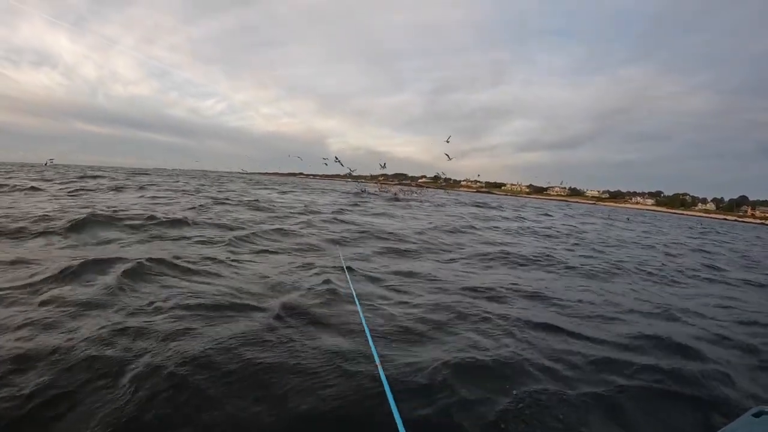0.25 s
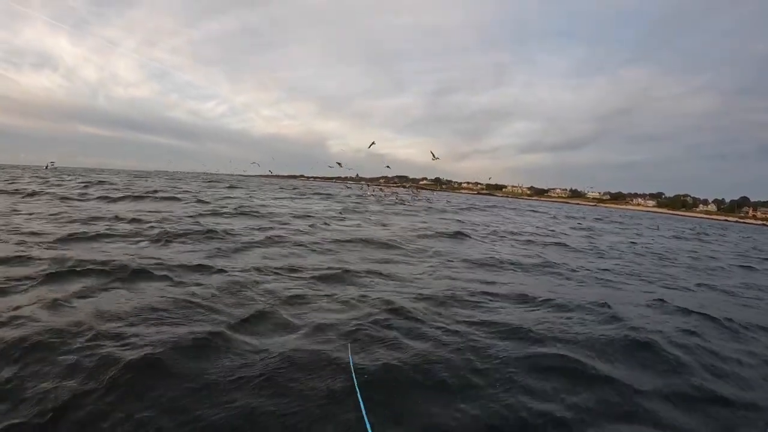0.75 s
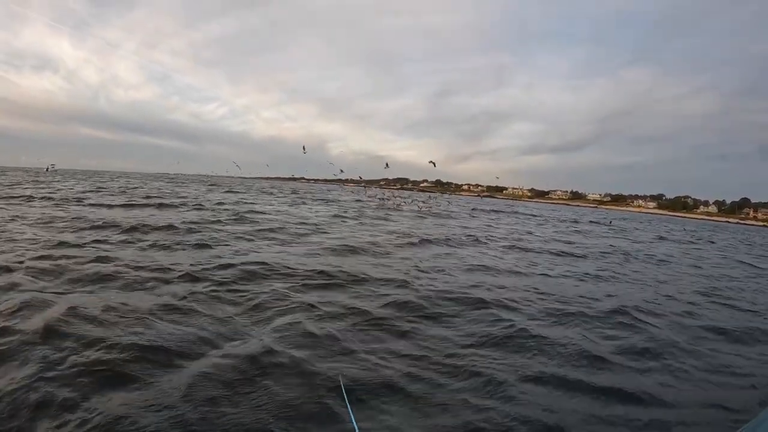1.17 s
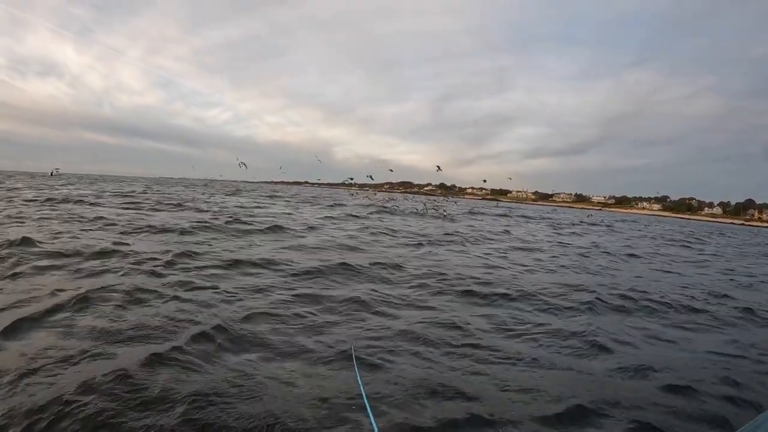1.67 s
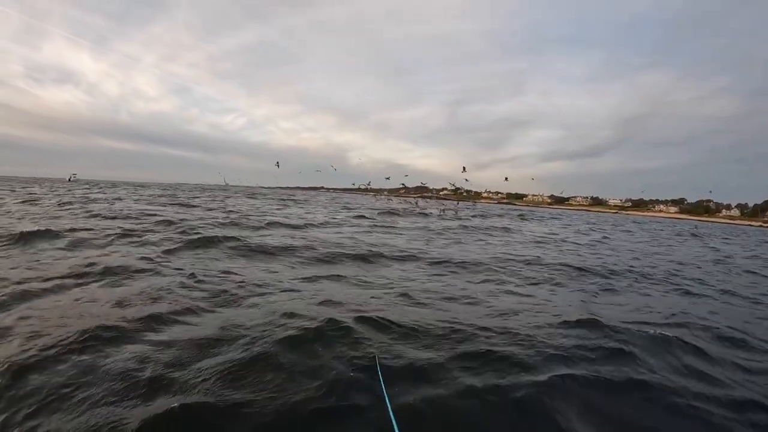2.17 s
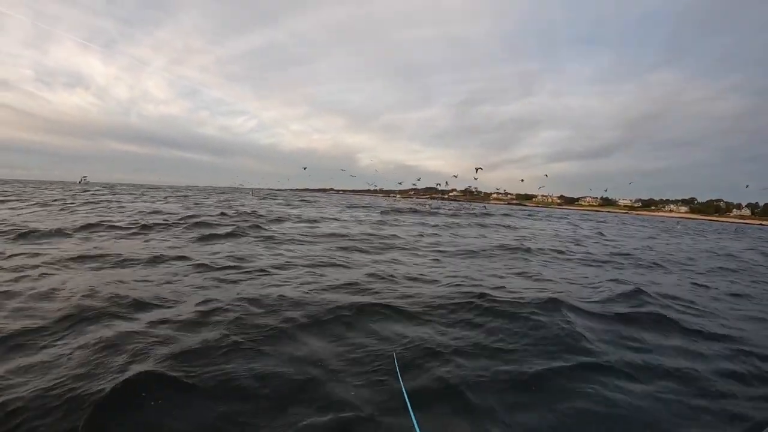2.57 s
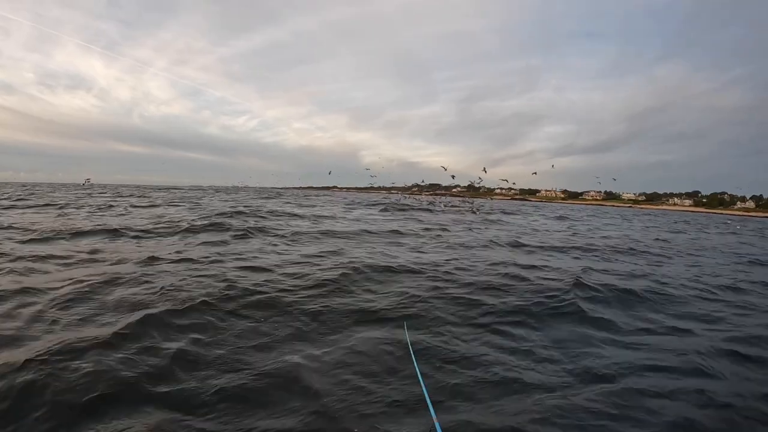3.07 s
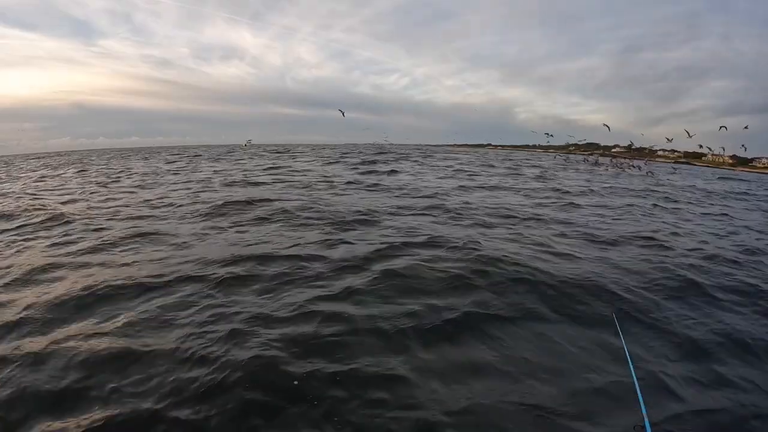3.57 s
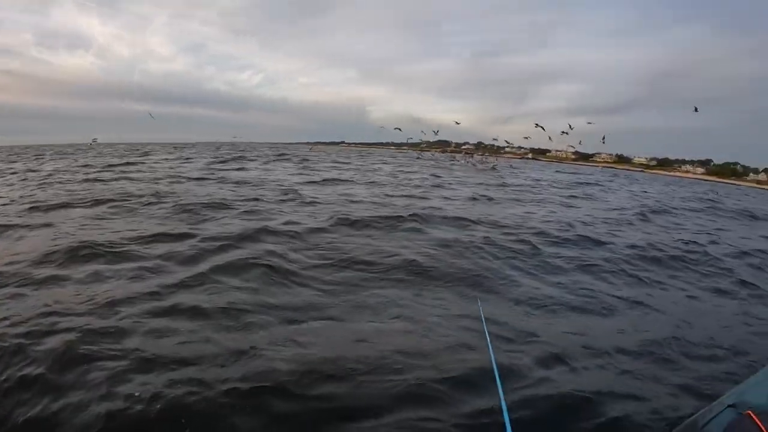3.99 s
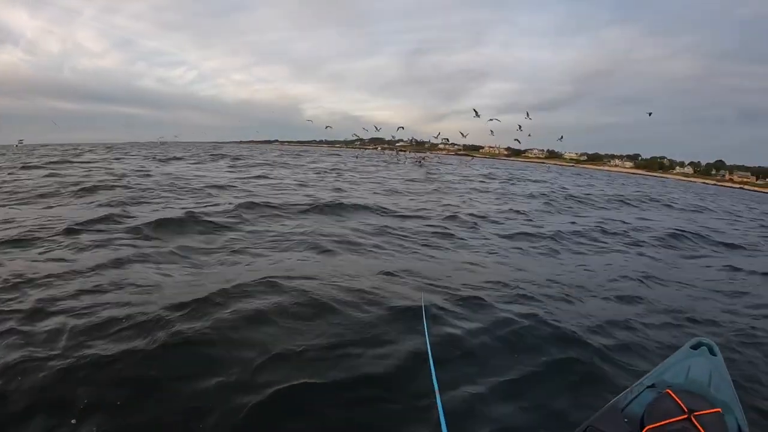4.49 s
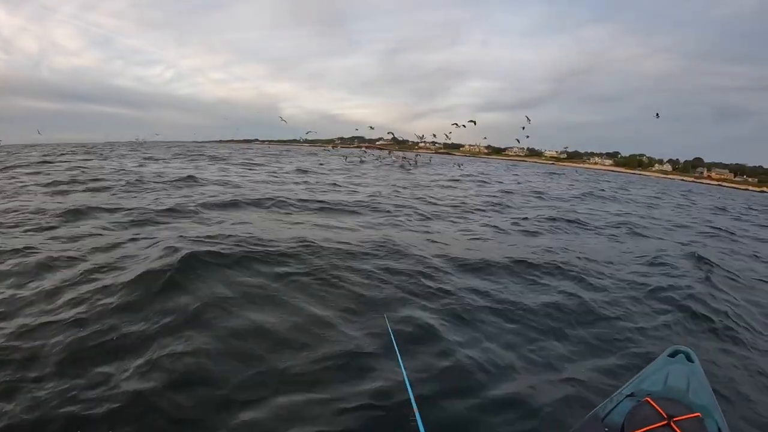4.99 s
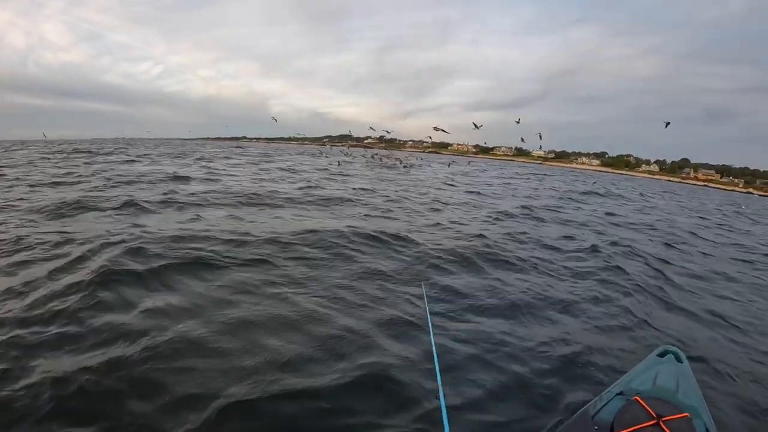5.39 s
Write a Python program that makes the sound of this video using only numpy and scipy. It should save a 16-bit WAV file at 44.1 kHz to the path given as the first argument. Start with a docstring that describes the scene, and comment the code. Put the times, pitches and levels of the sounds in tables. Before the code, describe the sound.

Shrill seabird whistles, harsh short squawks and distant flock chatter over soft sea hiss, with low wind buffeting the microphone throughout.

```python
"""Over choppy water, some way off, a flock of terns and gulls feeds: thin arched whistles, short harsh rasps,
a knot of quick chirps, and the blur of the birds behind. Wind buffets the small microphone; the sea hisses.
Whistles and chirps are near sines on bending pitches, rasps are harmonic series with half-pitch lines and
breath noise, and the far flock blends random notes with noise. Wind and sea are noise shaped in frequency
and time; short kicks of pressure sharpen the gusts."""
import sys
import numpy as np
from scipy import signal
from scipy.fft import rfft, irfft, next_fast_len
from scipy.io import wavfile
from scipy.ndimage import uniform_filter1d, map_coordinates

SR = 44100
rng = np.random.default_rng(int(sys.argv[2]) if len(sys.argv) > 2 else 0)


def put_to_file(sound):
    """Save the sound as 16-bit audio at rate SR, in the file named by the first command-line argument."""
    columns = np.atleast_2d(sound).T  # one column per channel
    safe = np.clip(columns, -1, 1)
    whole_steps = np.round(safe * 32767)
    wavfile.write(sys.argv[1], SR, whole_steps.astype(np.int16))


N = 248724  # length in samples

# Resonance of the birds' throats. Each row: frequency in Hz, gain in dB.
THROAT = [(1200, -11), (2000, -8.5), (2500, -4), (3000, 0), (3650, 2.5), (4400, -3.5), (6000, -8.5),
          (7500, -16), (8500, -33.5), (11000, -38.5), (14000, -61)]


def amp(db):
    """The decibel law: 20 dB is a factor of ten in amplitude."""
    return 10 ** (np.asarray(db) / 20)


def unit(x):
    """Normalisation by mean power: x at rms 1."""
    return x / np.sqrt(np.mean(x ** 2) + 1e-20)


def along(points, hz):
    """Interpolation of (Hz, value) points on a logarithmic frequency axis."""
    f, v = np.transpose(points)
    return np.interp(np.log(hz + 1), np.log(f + 1), v)


def curves(rows):
    """Linear interpolation in time: one value per sample for each column after the seconds."""
    s, *columns = np.transpose(rows)
    t = np.arange(N) / SR
    return [np.interp(t, s, column) for column in columns]


def wobble(rate, size=N):
    """Slow random fluctuation: a smooth curve through Gaussian knots, rate of them a second."""
    knots = rng.standard_normal(int(size * rate / SR) + 4)
    return map_coordinates(knots, [np.arange(size) * rate / SR], order=2)


def coloured(x, points):
    """Linear filtering: multiplies the spectrum of x by the gains of (Hz, dB) points."""
    m = next_fast_len(len(x) + 4096)
    gain = amp(along(points, np.fft.rfftfreq(m, 1 / SR)))
    return irfft(rfft(x, m) * gain, m)[:len(x)]


def rush(spectrum, patchy_db):
    """Turbulent noise of rms 1: energy gathers in random patches of time and frequency."""
    z = signal.stft(rng.standard_normal(N), nperseg=512)[2]
    field = uniform_filter1d(rng.standard_normal(z.shape), 5, 0)  # smooth over frequency
    field = uniform_filter1d(field, 8, 1)  # smooth over time
    patchy = signal.istft(z * amp(patchy_db * unit(field)), nperseg=512)[1][:N]
    return unit(coloured(patchy, spectrum))


def add(track, s, sound):
    """Superposition: sums a sound into the track from s seconds on, or from 0 if s is negative."""
    room = track[max(round(s * SR), 0):][:len(sound)]
    room += sound[:len(room)]


def whistle(rows, octave_db, waver, shimmer_db):
    """Near-sinusoidal oscillation of one membrane: weak overtones, slight tremble of pitch and strength."""
    half_db, third_db = -33.5, -30  # half-pitch lines under the note; third partial under the octave
    fade = .005  # seconds added at each end
    s, hz, db = np.transpose(rows)
    t = np.arange(s[0] - fade, s[-1] + fade, 1 / SR)
    pitch = uniform_filter1d(np.interp(t, s, hz), size=300)
    pitch = pitch * (1 + waver * wobble(120, size=len(t)))
    phase = 2 * np.pi * np.cumsum(pitch) / SR
    edge = np.clip(np.minimum(t - t[0], t[-1] - t) / (2 * fade), 0, 1) ** 2
    level = amp(np.interp(t, s, db) + shimmer_db * wobble(110, size=len(t))) * np.sqrt(2)
    # The overtones flicker more than the main line
    flicker = amp(octave_db + 1.3 * shimmer_db * wobble(90, size=len(t)))
    overtones = flicker * (np.sin(2 * phase) + amp(third_db) * np.sin(3 * phase))
    # Every other beat is a little weaker: faint lines at 1/2 and 3/2 of the pitch
    main = np.sin(phase) * (1 + 2 * amp(half_db) * np.cos(phase / 2))
    return edge * level * (main + overtones)


def flock(count=560):
    """Incoherent addition of many farther birds: short hoarse notes blur into a shrill wash."""
    # Loudness of the birds behind. Each row: time in seconds, level in dB before the mix of calls and wash.
    flock_level = [(0, -39.5), (.9, -39.5), (1.4, -39.5), (2.2, -44), (2.9, -44), (3.3, -50), (3.7, -43.5),
                   (4.4, -47.5), (4.85, -42.5), (5.2, -50.5), (5.64, -37)]
    calls_db, wash_db = -5.5, -7
    calls = np.zeros(N)
    for when, high, long, bend, loud, octave in rng.random((count, 6)):
        s = when * (N / SR + .1) - .1
        hz = 1500 * 3.6 ** high
        length = .012 + 0.05 * long ** 2
        db = -6 * loud
        arch = [(0, hz * (1 - 0.059 * bend), db + 2),
                (length / 3, hz, db),
                (length, hz * (1 - 0.13 * bend), db - 0.5)]
        add(calls, s, whistle(arch, 3 - 14 * octave, waver=0.013, shimmer_db=2.0))
    flatter_throat = [(f, 0.86 * g) for f, g in THROAT]
    chatter = amp(calls_db) * unit(coloured(calls, flatter_throat))
    wash = amp(wash_db) * rush(THROAT, patchy_db=3.5)
    return amp(curves(flock_level)[0]) * (chatter + wash)


def wind():
    """Turbulent pressure on the microphone: eddies rumble, and small ones breaking on the port flutter."""
    # Gusts and lulls. Each row: time in seconds, rumble level in dB, flutter level in dB.
    gusts = [(0.0, -26.5, -37), (0.35, -23.5, -40.5), (0.41, -17, -30), (0.5, -27, -33.5), (0.6, -14, -26),
             (0.79, -20.5, -33), (1.01, -16.5, -26.5), (1.3, -21.5, -34.5), (1.42, -21.5, -40),
             (1.73, -17.5, -30.5), (1.9, -20, -33.5), (2.0, -18, -22), (2.08, -23, -39.5), (2.2, -18, -28),
             (2.33, -23, -38.5), (2.48, -17, -42.5), (2.58, -28.5, -45.5), (2.71, -21, -34),
             (2.86, -25, -39), (3.06, -31.5, -41), (3.29, -19, -33.5), (3.43, -28.5, -38.5),
             (3.53, -20.5, -41), (3.88, -30.5, -44.5), (3.95, -26.5, -41), (4.03, -19, -41),
             (4.24, -17, -17.5), (4.66, -19, -41), (5.23, -17.5, -29.5), (5.33, -17, -35.5),
             (5.5, -17.5, -27), (5.64, -21.5, -35)]
    # Spectra of the large and the small eddies. Each row: frequency in Hz, relative gain in dB.
    rumble_spectrum = [(8, -11), (20, 3), (30, 2), (42, 0.5), (70, -1), (125, -6), (200, -14), (300, -23.5),
                       (600, -85)]
    flutter_spectrum = [(76, -37.5), (130, 3), (171, 0.5), (397, -6.5), (502, -10.5), (1500, -35.5),
                        (1950, -65), (3300, -120)]
    # Bursts of sharp eddies. Each row: time in seconds, reference level in dB for the burst and its kicks.
    puffs = [(0.598, -22.5), (1.299, -21.5), (1.683, -22), (1.737, -16), (1.766, -14.5), (1.99, -17.5),
             (2.19, -23.5), (2.228, -27), (2.456, -22), (3.35, -23), (4.076, -23.5), (4.198, -15.5),
             (4.222, -20.5), (4.278, -9), (4.319, -23), (4.368, -20.5), (4.394, -14.5), (4.428, -20),
             (4.627, -22.5), (5.102, -20), (5.179, -22.5), (5.231, -13.5), (5.527, -19)]
    # Spectrum of one pressure kick. Each row: frequency in Hz, gain in dB.
    kick_spectrum = [(120, -26), (350, -3), (750, -1), (1400, -11), (2300, -60)]
    kick_db, kick_gap = 22, .011  # impulse size over the puff level; nominal spacing in seconds

    rumble_db, flutter_db = curves(gusts)
    lumps = wobble(30)
    # The diaphragm stiffens on big swings
    rumble = unit(np.tanh(0.24 * amp(0.55 * lumps) * rush(rumble_spectrum, patchy_db=0.6)))
    gusting_db = 3.53 * np.tanh(lumps) + 3.4 * np.tanh(wobble(90))
    flutter = unit(amp(gusting_db) * rush(flutter_spectrum, patchy_db=0.06))

    bursts, kicks = np.zeros(N), np.zeros(N)
    swell = np.sin(np.pi * np.linspace(0, 1, round(0.043 * SR)) ** 0.5) ** 2  # rises faster than it dies
    order = np.arange(4)
    for s, db in puffs:
        add(bursts, s - .004, amp(db - 6) * swell)
        draw = rng.uniform(-1.2, 1, 4)  # sets both the sign and the timing of each kick
        at = s + .002 + kick_gap * (order + .3 * draw * order ** .5)
        sizes = amp(db + kick_db - 2.5 * order) * np.sign(draw)
        add(kicks, 0, np.bincount((at * SR).astype(int), sizes))
    sharp = unit(amp(3 * np.tanh(wobble(140))) * rush(flutter_spectrum, patchy_db=2))
    steady = amp(rumble_db) * rumble + amp(flutter_db) * flutter
    return steady + bursts * sharp + coloured(kicks, kick_spectrum)


def sea():
    """Broadband noise of breaking water: waves far and near merge into a soft hiss."""
    # Spectrum of the hiss. Each row: frequency in Hz, relative gain in dB.
    sea_spectrum = [(290, -37), (500, -4), (718, -6), (1270, -3.5), (1790, -6.5), (2690, -8), (3560, -13),
                    (5180, -28), (7350, -27.5), (8170, -34), (10600, -64), (12500, -88.5), (18000, -120)]
    level_db = -45 + 0.23 * wobble(2.7)
    return amp(level_db) * rush(sea_spectrum, patchy_db=3.5)


def whistles():
    """Frequency modulation of near sines: each clear line bends along a parabola, low ones hoarser."""
    # Clear whistled lines: main pitches and some separate upper partials. Each row: start in seconds,
    # length in seconds, first, middle and last frequency in Hz, level at the middle in dB,
    # swell from start to end in dB, octave over the main line in dB.
    whistled_lines = [(.003, 0.1, 3550, 3380, 3600, -42, -19, -20),
                      (0.028, 0.059, 4930, 5060, 4840, -40.5, -1, -26),
                      (0.086, 0.085, 2810, 3070, 2950, -35, 12, -11),
                      (0.167, 0.12, 2990, 3130, 2860, -34.5, 0, -13.5),
                      (0.087, 0.1, 4130, 4074, 4130, -33.5, -10, -23),
                      (0.151, 0.11, 5020, 5310, 4960, -42, -6, -31),
                      (0.249, 0.12, 5040, 4770, 4780, -41.5, 3, -36),
                      (0.356, 0.088, 4810, 4780, 4340, -41, -1, -34),
                      (0.16, 0.14, 4180, 4140, 3850, -41.5, 3, -31),
                      (0.27, 0.048, 3770, 3710, 3600, -36.5, 1, -25),
                      (0.3, 0.082, 3800, 3780, 3560, -37.5, 5, -16),
                      (0.368, 0.057, 2094, 2100, 2060, -40.5, -3, -45),
                      (0.432, 0.053, 2910, 2890, 2760, -38.5, -2, -30),
                      (0.441, 0.052, 3500, 3370, 3000, -41, 4, -18),
                      (0.489, 0.055, 3280, 3240, 3370, -42, -7, -18),
                      (0.649, 0.071, 3600, 3480, 3540, -40.5, -7, -13),
                      (.74, 0.067, 3620, 3470, 3560, -40, -3, -12),
                      (0.802, 0.043, 3650, 3360, 3120, -42.5, 8, -9),
                      (0.684, 0.072, 3010, 3030, 3000, -48, -1, -23),
                      (0.972, 0.1, 4250, 4180, 3980, -48, 0, -30),
                      (0.681, 0.093, 1493, 1500, 1540, -45, -10, -6),
                      (0.8, 0.058, 3600, 4040, 4040, -53, 1, -0.5),
                      (0.855, 0.15, 4100, 4090, 3770, -56.5, -1, -3.5),
                      (0.932, 0.061, 3130, 3054, 3240, -33, -9, -24),
                      (0.983, 0.094, 3230, 3220, 3100, -35.5, 3, -11.5),
                      (1.059, 0.091, 3120, 3125, 2860, -37.5, 0, -17),
                      (1.017, 0.18, 3360, 3317, 3260, -40, -5, -13),
                      (1.162, 0.033, 3200, 3220, 3680, -31, -2, -15),
                      (1.165, 0.032, 1600, 1630, 1780, -38.5, -1, -30),
                      (1.19, 0.1, 4570, 4570, 4380, -33, -6, -35),
                      (1.352, 0.21, 2850, 3145, 2700, -37, 6, -10.5),
                      (1.474, 0.037, 3920, 4380, 4580, -31.5, 1, -31),
                      (1.49, 0.066, 3950, 3570, 3560, -35.5, -2, -19),
                      (1.503, 0.2, 4980, 5340, 4790, -37.5, -7, -31.5),
                      (1.69, 0.091, 4870, 4820, 4970, -40.5, 3, -39),
                      (1.759, 0.086, 5050, 4870, 3850, -39, -5, -36),
                      (1.67, 0.055, 3950, 3880, 4060, -42, 0, -30),
                      (1.629, 0.084, 3720, 3630, 3540, -45, 2, -30),
                      (1.729, 0.075, 3300, 3480, 3410, -37.5, -1, -13.5),
                      (1.83, 0.12, 3430, 3680, 3390, -41, -4, -27),
                      (1.927, 0.045, 3440, 3520, 3760, -41, 0, -18),
                      (1.954, 0.084, 3500, 3510, 3060, -39, 3, -17.5),
                      (1.961, 0.09, 4000, 4430, 3900, -44, 8, -25),
                      (2.037, 0.15, 4030, 4240, 4170, -49, -10, -26),
                      (2.184, 0.11, 4220, 3970, 3750, -46.5, 12, -18),
                      (1.98, 0.086, 2950, 2890, 2700, -39.5, -2, -13),
                      (2.319, 0.062, 2440, 2394, 2530, -42.5, -3, -8),
                      (2.358, 0.088, 2900, 2980, 2720, -47, 2, -37),
                      (2.398, 0.052, 3830, 3780, 3680, -35.5, 3, -11),
                      (2.448, 0.07, 3720, 3480, 4070, -37, -6, -20),
                      (2.472, 0.053, 2850, 3040, 3050, -45.5, -27, -12),
                      (2.532, 0.16, 4840, 4890, 4780, -48, 17, -30),
                      (2.68, 0.138, 4720, 4780, 4730, -43.5, -3, -33),
                      (2.519, 0.27, 7240, 7270, 7040, -59, 0, -38),
                      (2.52, 0.24, 4270, 4490, 4450, -44, 4, -37),
                      (2.534, 0.3, 2110, 2143, 1950, -50, 9, -31),
                      (2.834, 0.14, 2880, 3010, 2940, -52, -4, -23),
                      (3.053, 0.049, 3350, 3520, 3660, -42.5, 4, -28),
                      (3.096, 0.081, 3620, 3805, 3460, -40, -5, -18.5),
                      (3.178, 0.096, 3460, 3680, 3390, -48, 6, -12),
                      (3.268, 0.058, 3530, 3600, 3200, -47, 3, -14),
                      (3.263, 0.065, 3210, 3170, 2930, -41, 2, -21),
                      (3.418, 0.053, 3650, 3500, 3600, -47.5, -6, -14),
                      (3.466, 0.059, 3600, 3740, 3680, -48, 4, -27),
                      (3.517, 0.036, 3800, 3940, 4070, -43, -3, -13),
                      (3.667, 0.09, 6530, 6460, 6570, -58, -4, -35),
                      (3.562, 0.038, 3790, 3900, 4100, -46, -2, -18),
                      (3.529, 0.047, 2020, 2150, 2230, -45, 0, -30),
                      (3.614, 0.04, 3950, 4050, 4180, -47, -6, -19),
                      (3.668, 0.031, 4000, 4040, 4150, -52, 0, -12),
                      (3.893, 0.039, 3400, 3480, 3400, -44, 0, -16),
                      (3.583, 0.052, 6300, 6200, 6440, -56, -5, -40),
                      (3.638, 0.13, 5000, 4880, 4900, -55, 0, -40),
                      (3.73, 0.025, 3950, 3870, 3800, -52, 0, -9),
                      (3.759, 0.049, 2300, 2410, 2220, -43.5, 11, -28),
                      (3.772, 0.14, 3150, 2940, 2840, -44.5, -2, -13),
                      (3.847, 0.052, 3400, 3320, 3240, -43.5, -2, -10),
                      (3.935, 0.073, 3420, 3380, 3130, -42, -12, -10),
                      (3.962, 0.045, 4500, 4300, 4480, -47, -2, -30),
                      (3.997, 0.04, 2570, 2690, 2860, -43.5, -4, -10),
                      (4.025, 0.12, 3700, 3780, 3540, -43, 10, -15),
                      (4.146, 0.098, 3626, 3430, 3587, -37, 0, -28),
                      (4.232, 0.1, 3555, 3470, 3080, -42, -18, -30),
                      (4.285, 0.076, 3640, 3610, 3500, -47.5, 15, -17),
                      (4.351, 0.071, 3450, 3750, 3630, -36, -2, -22),
                      (4.418, 0.12, 3660, 3790, 3750, -43.5, 1, -19.5),
                      (4.525, 0.13, 3730, 3840, 3660, -40.5, -5, -32),
                      (4.655, 0.05, 3640, 3590, 3570, -37.5, 4, -18),
                      (4.501, 0.13, 3555, 3380, 3690, -43, 22, -25),
                      (4.724, 0.065, 4420, 4260, 4540, -49, -4, -40),
                      (4.786, 0.13, 3260, 3350, 3130, -38, 3, -18),
                      (4.809, 0.054, 2096, 2166, 2300, -44, 1, -36),
                      (4.821, 0.04, 4050, 4360, 4450, -38.5, 0, -26),
                      (4.847, 0.079, 4530, 4480, 4610, -34, 5, -31),
                      (4.918, 0.13, 4650, 4200, 3870, -40, -12, -27),
                      (4.844, 0.039, 4020, 3600, 4020, -33.5, 2, -34),
                      (4.886, 0.018, 3900, 3670, 3400, -32.5, 14, -32),
                      (4.899, 0.13, 3500, 3210, 3170, -43, -8, -23),
                      (4.9, 0.03, 2120, 2220, 2300, -43.5, -2, -10),
                      (4.941, 0.15, 2320, 2326, 2300, -46, -16, -8),
                      (4.944, 0.11, 1560, 1364, 1310, -44, -4, -34),
                      (5.008, 0.057, 2700, 2576, 2740, -40, -10, -46),
                      (5.045, 0.071, 4260, 3950, 3570, -50, -1, -25),
                      (5.293, 0.056, 2400, 2410, 2370, -40.5, 0, -10),
                      (5.313, 0.024, 3560, 3400, 3300, -37.5, -10, -15.5),
                      (5.333, 0.044, 3380, 3440, 3950, -41.5, 13, -18),
                      (5.374, 0.18, 4420, 4690, 4460, -41.5, -4, -33),
                      (5.524, 0.053, 4460, 4560, 4360, -43, -1, -35),
                      (5.569, 0.071, 4400, 4360, 4450, -43, -3, -31),
                      (5.379, 0.23, 6800, 6930, 6680, -55.5, 9, -49),
                      (5.49, .14, 3560, 3660, 3620, -48, -8, -12),
                      (5.483, 0.042, 3000, 3200, 3520, -46, 9, -28),
                      (5.465, 0.086, 2340, 2430, 2220, -42, 1, -45),
                      (5.55, 0.1, 4850, 4820, 4690, -44.5, -1, -33),
                      (5.557, 0.11, 2445, 2400, 2310, -44, -5, -50)]
    soft_ends_db = -3  # both ends lowered by this much, before the swell is added
    out = np.zeros(N)
    u = np.linspace(-1, 1, 9)  # from start to end of the line
    for s, length, first, middle, last, db, swell_db, octave_db in whistled_lines:
        hz = middle + (last - first) / 2 * u + ((first + last) / 2 - middle) * u ** 2
        level_db = db + swell_db * u / 2 + soft_ends_db * u ** 2
        rows = np.transpose([s + length * (u + 1) / 2, hz, level_db])
        hoarse = (3500 / first) ** 2
        line = whistle(rows, octave_db, waver=0.005 * hoarse, shimmer_db=1.5 * hoarse ** .5)
        add(out, s - .005, line)  # early by the fade
    return out


def rasps():
    """Period doubling in a rich low voice: the membrane skips every other beat and shakes each line."""
    # Harsh calls. Each row: time of the peak in seconds, fall after it in seconds (the rise takes 0.6 of that),
    # level in dB before the swell, pitch at the peak in Hz, half-pitch lines in dB, roughness from 0 to 1,
    # treble tilt in dB per octave between 3200 and 7000 Hz.
    harsh_calls = [(0.109, 0.09, -33.5, 991, 5, 0.87, 1), (0.401, .06, -34.5, 1404, 0, 0.45, -16),
                   (0.561, 0.13, -34.5, 1138, 1, 0.8, -2), (0.851, 0.043, -43, 1166, -1, 0.2, 20),
                   (0.897, 0.041, -36.5, 1092, -8, 0, -9), (1.14, 0.085, -32, 1181, 0, 0.81, -2.5),
                   (1.31, 0.055, -30.5, 1124, 4, 0.52, -4), (1.575, 0.092, -39, 1134, 5, 0.9, -1),
                   (1.754, 0.027, -37.5, 1135, 0, 0, 4), (1.866, 0.076, -38.5, 1202, -4, 0.76, -3.5),
                   (2.074, 0.048, -38.5, 997, -2, 0.07, -11), (2.297, 0.062, -35, 1074, -1, 0.69, 4.5),
                   (2.502, 0.05, -39, 1035, -6, 0.7, -5), (3.002, 0.05, -31, 1099, 1, 0.7, -14),
                   (3.406, 0.035, -40, 1153, -5, 0.74, 1.5), (3.565, 0.058, -43.5, 1246, 2, 0.5, 8),
                   (3.777, 0.072, -40, 1244, -2, 0.7, 1), (4.143, 0.17, -45, 1404, -3, 0.6, 3),
                   (4.276, 0.037, -36, 1215, -20, 0.18, -11), (4.602, .05, -33.5, 1257, -9, 0.64, -7.5),
                   (4.705, 0.041, -33, 1174, -8, 0.7, -4.5), (4.829, .04, -39, 1176, -11, 0.16, -1),
                   (4.923, 0.14, -40, 1150, -5, 0.65, 0), (5.3, 0.039, -35, 1232, 1, 0.7, -7),
                   (5.455, 0.075, -33, 1218, -7, 0.75, -1), (5.545, 0.11, -40.5, 1200, -10, 0.73, -5)]
    out = np.zeros(N)
    lines = np.arange(2, 20)[:, None]  # multiples of half the pitch
    for s, length, db, hz, half_db, rough, bright_db in harsh_calls:
        u = np.linspace(-.6, 1, round(1.6 * length * SR))  # 0 at the peak
        rough = np.clip(rough, 0, 1)
        arch = 1 - np.where(u < 0, .55, .15) * u ** 2  # swoops up, then sags a little
        pitch = hz * arch * (1 + .02 * rough * wobble(250, size=len(u)))
        half_phase = np.pi * np.cumsum(pitch) / SR
        random_curves = wobble(250, size=2 * lines.size * len(u))
        shake, tremble = random_curves.reshape(2, lines.size, -1)
        sizes = amp(half_db * (lines % 2) + 4.5 * rough * tremble)  # odd lines belong to the half pitch
        voice = np.sum(sizes * np.sin(lines * half_phase + 2.7 * rough * shake), axis=0)
        voice *= amp(3 * rough * wobble(200, size=len(u)))  # beats that rattle
        voice += 2.4 * rough * rng.standard_normal(len(u))  # air hissing past the membrane
        throat = [(f, g + bright_db * np.log2(np.clip(f, 3200, 7000) / 3600)) for f, g in THROAT]
        swell = np.cos(np.pi / 2 * np.where(u < 0, u / u[0], u)) ** 2  # opens faster than it dies
        add(out, s + u[0] * length, amp(db) * unit(coloured(voice, throat)) * swell)
    return out


def squabble(count=90):
    """Rapid pitch glides: a knot of birds bickers in short chirps, up or down, rich in overtones."""
    # The bickering. One row: first chirp from and last chirp until in seconds, level of the loudest chirps in dB.
    start, end, db = (3.46, 4.03, -53)
    out = np.zeros(N)
    for when, high, bend, loud in rng.random((count, 4)):
        hz = 3000 * 1.65 ** high
        chirp_db = db - 6 * loud
        chirp = [(0, hz, chirp_db), (.022, hz * (.97 + .08 * bend), chirp_db)]
        sound = whistle(chirp, -9 - 16 * high, waver=.009, shimmer_db=4)
        add(out, start + when * (end - start), sound)
    return out


def scene():
    """Superposition of birds, wind and water at one microphone."""
    birds = flock() + whistles() + rasps() + squabble()
    return (birds + wind() + sea())[None]


def record(dry):
    """Saturation and band limiting: the input stage rounds the biggest swings, then the top is cut off."""
    top_hz = 15700
    rounded = dry / (1 + np.abs(dry / .52) ** 4) ** (1 / 4)  # output stays under 0.52
    m = next_fast_len(N + 4096)
    kept = np.fft.rfftfreq(m, 1 / SR) < top_hz
    return irfft(rfft(rounded, m) * kept, m)[:, :N]


dry = scene()
out = record(dry)
put_to_file(out)
```